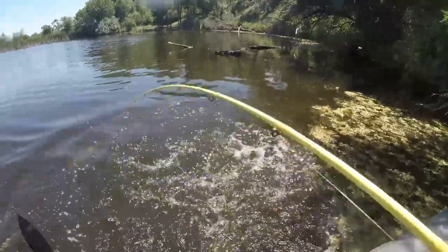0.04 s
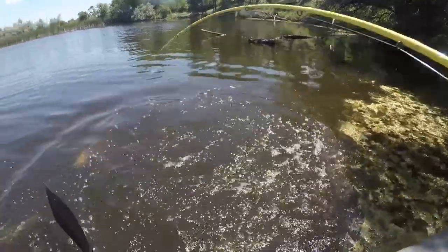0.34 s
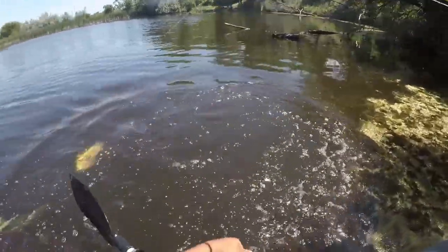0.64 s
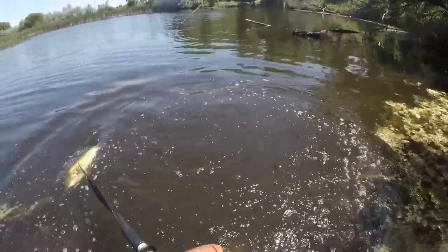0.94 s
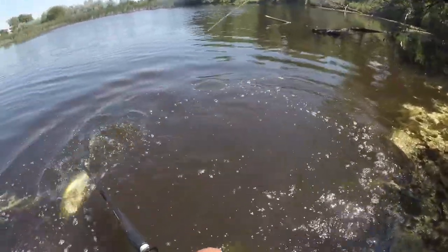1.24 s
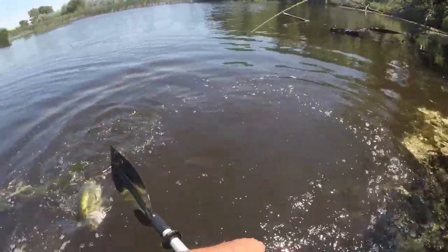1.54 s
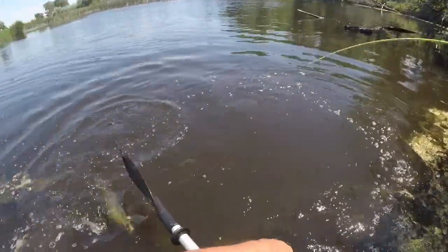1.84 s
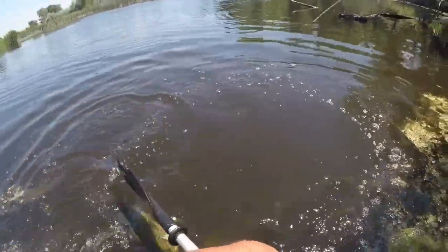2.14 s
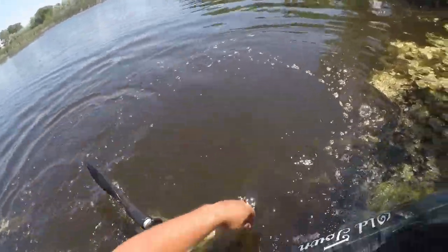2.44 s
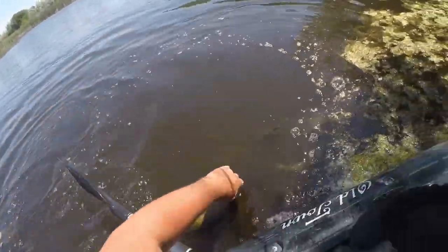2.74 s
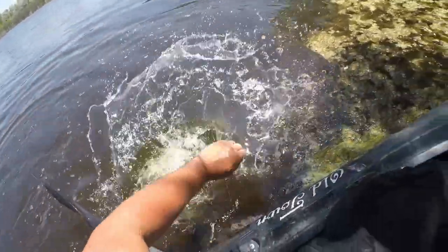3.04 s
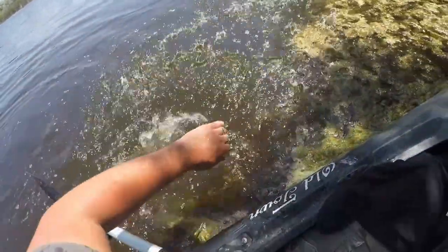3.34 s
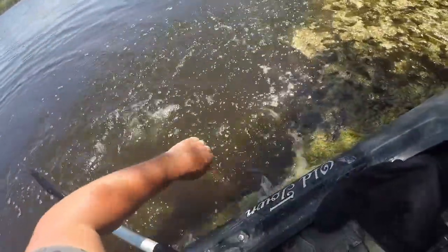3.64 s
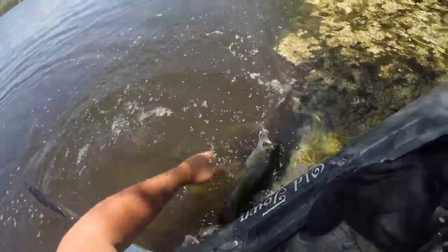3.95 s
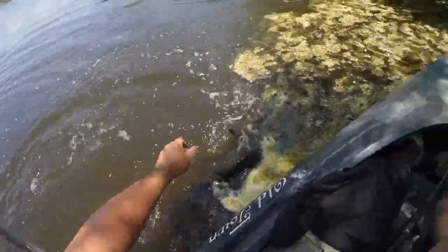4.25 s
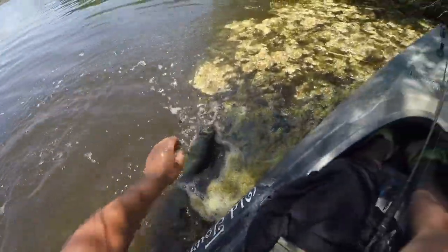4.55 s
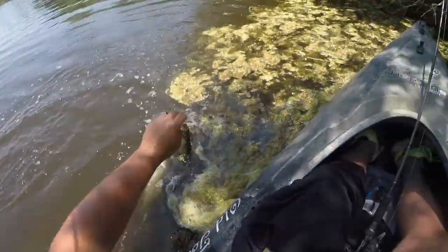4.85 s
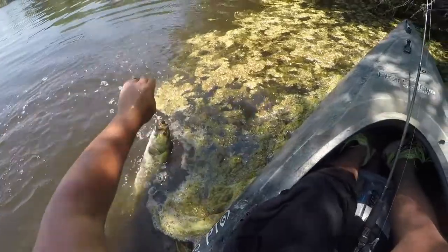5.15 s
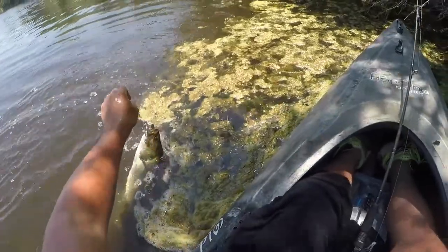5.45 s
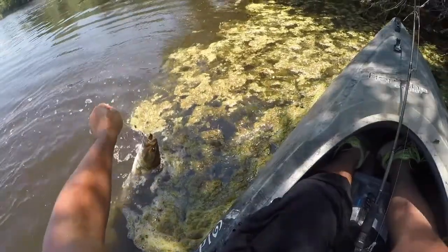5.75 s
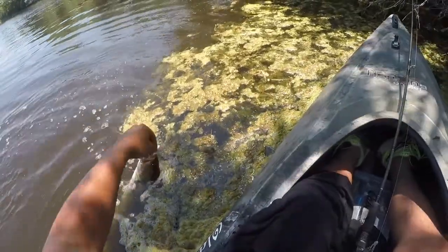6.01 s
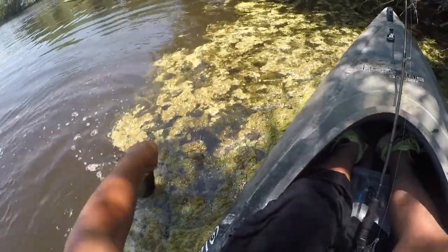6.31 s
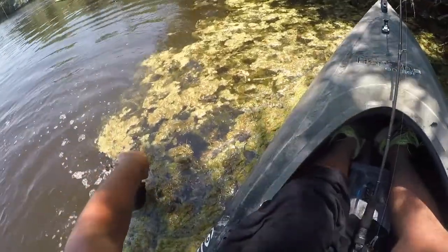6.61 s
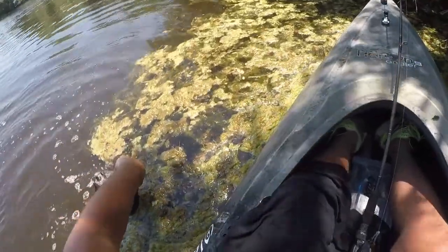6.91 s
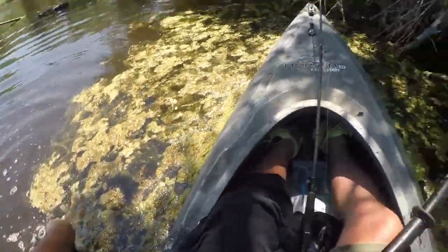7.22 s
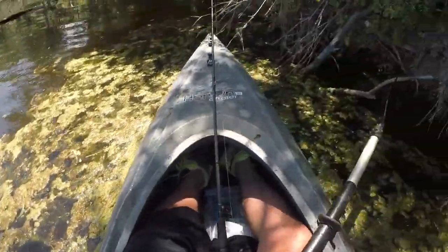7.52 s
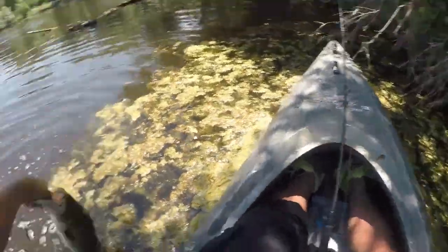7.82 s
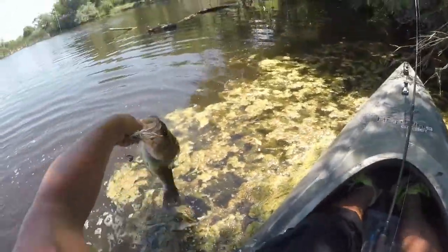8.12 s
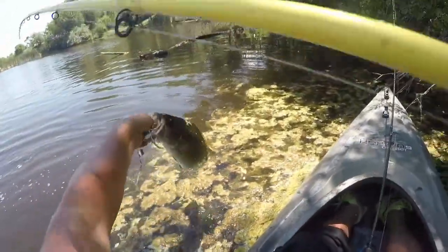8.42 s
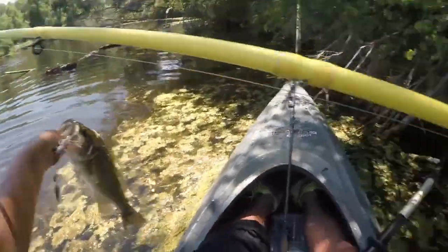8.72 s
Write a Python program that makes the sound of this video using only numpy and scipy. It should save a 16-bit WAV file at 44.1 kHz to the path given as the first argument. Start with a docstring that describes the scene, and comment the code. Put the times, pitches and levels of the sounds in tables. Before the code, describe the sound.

Close gurgling and a loud burst of splashing from a fish beside a small boat, settling into soft wind, bird chirps and knocks.

```python
"""Landing a fish from a kayak

On a pond, a hooked fish wallows right beside the boat, throws one big splash and is lifted out dripping.
The water sounds through ringing air pockets, bubbles and spray; tackle thuds on the hull.
Birds chip in the bank trees. Light wind, clothing and dull knocks sound at the body-worn microphone."""
import sys
import numpy as np
from scipy import signal
from scipy.fft import rfft, irfft, next_fast_len
from scipy.io import wavfile
from scipy.ndimage import uniform_filter1d, map_coordinates

SR = 44100
rng = np.random.default_rng(int(sys.argv[2]) if len(sys.argv) > 2 else 0)


def to_wav(s):
    """Save 16-bit WAV."""
    ch = np.atleast_2d(s).T  # columns
    pcm = np.round(np.clip(ch, -1, 1) * 32767)  # PCM
    wavfile.write(sys.argv[1], SR, pcm.astype(np.int16))


N = 391166

# tone of close spray: frequency_hz, density_db
SPRAY_SPECTRUM = [(900, -0.5), (2300, -2), (3500, -1.5), (6300, 3), (8500, -14), (11500, -23.5),
                  (13500, -17.5), (15000, -41.5)]
# tone of air or cloth brushing the microphone: frequency_hz, density_db
BRUSH_SPECTRUM = [(70, -25.5), (160, 0), (250, 1), (400, -12.5), (800, -20.5), (6000, -50)]
# reverberation of the bank trees: frequency_hz, t60_s
TREE_DECAY = [(200, 0.357), (10000, 0.118)]


def amp(db):
    """Decibels to gain."""
    return 10 ** (np.asarray(db) / 20)


def unit(x):
    """Scale to rms 1."""
    return x / np.sqrt(np.mean(x ** 2) + 1e-20)


def along(points, hz):
    """Read (frequency_hz, value) points on a log frequency axis."""
    point_hz, values = np.transpose(points)
    return np.interp(np.log(hz + 1), np.log(point_hz + 1), values)


def curves(rows, outside=None):
    """One value per sample for each column after the time."""
    time_s, *columns = np.transpose(rows)
    return [np.interp(np.arange(N) / SR, time_s, column, outside, outside) for column in columns]


def wobble(rate):
    """A smooth random curve, rate knots a second."""
    return map_coordinates(rng.standard_normal(int(N * rate / SR) + 4), [np.arange(N) * rate / SR])


def filtered(x, response):
    """Apply a gain that is a function of frequency."""
    length = x.shape[-1]
    padded = next_fast_len(length + 8192)
    return irfft(rfft(x, padded) * response(np.fft.rfftfreq(padded, 1 / SR)), padded)[..., :length]


def coloured(x, spectrum):
    """Shape by (frequency_hz, gain_db) points, at rms 1."""
    return unit(filtered(x, lambda hz: amp(along(spectrum, hz))))


def panned(x, pan_db=0):
    """Place in stereo by a fixed or moving level difference; positive is left."""
    gains = amp(np.reshape([pan_db / 2, -pan_db / 2], (2, -1)))
    return x * gains / gains.mean(axis=0)


def noise(spectrum, side_db, pan_db):
    """Coloured stereo noise with a given width and lean."""
    mid, side = coloured(rng.standard_normal((2, N)), spectrum)
    return panned(mid, pan_db) + amp(side_db) * np.array([side, -side])


def add(track, start_s, sound):
    """Mix a sound into a track at a time."""
    start = max(round(start_s * SR), 0)
    track[..., start:start + sound.shape[-1]] += sound[..., :max(N - start, 0)]


def levelled(x, level):
    """Make a grainy texture follow a short-term level."""
    power = np.abs(uniform_filter1d(np.mean(x ** 2, axis=0), size=2600))
    floor = .02 * np.mean(power[level > level.max() / 1000])
    return level * x / np.sqrt(power + floor)


def bubble_cloud(level, rate, low_hz, high_hz, cycles, spread_db, rise=0.232, width=0.186):
    """Bubbles ring and rise in pitch; they crowd to rate a second where the level is highest."""
    births = np.flatnonzero(rng.random(N) < rate / SR * (level / level.max()) ** .65)
    register, size, side, life = rng.random((len(births), 4)).T[:, :, None]
    hz = low_hz * (high_hz / low_hz) ** register
    t = np.arange(int(np.clip(cycles / low_hz, .001, .08) * SR)) / SR
    age = t * hz / (cycles * (life + .5))
    phase = 2 * np.pi * hz * t * (1 + rise * age / 2)
    ring = amp(-60 * age) * (1 - np.exp(-(t * hz / 2) ** 2))  # swells over two cycles
    ring = ring * amp(-spread_db * np.log(size + 0.00555))  # a few are much larger than the rest
    samples = (births[:, None] + np.arange(len(t))).ravel()
    lead = width * (side - .5)  # a bubble off to one side reaches that channel earlier
    channels = [ring * np.sin(phase + shift) for shift in (lead, -lead)]
    return np.array([np.bincount(samples, channel.ravel(), N)[:N] for channel in channels])


def fish_strokes(rounding=1.6, foam_db=-25, foam_fade_db_per_s=10, trickle_db=-71):
    """Bubbling and spray levels: each stroke rises and fades, and leaves foam that fizzes on."""
    # the fish wallows, thrashes and is lifted: peak_s, bubbling_db, spray_db, rise_20db_s, fade_20db_s
    strokes = [(0.07, -51, -53, 0.13, 0.3641), (0.853, -37, -45, 0.1382, 0.059),
               (0.935, -44, -51, 0.1841, 0.0755), (1.018, -38, -47, 0.1031, 0.1457),
               (1.135, -44, -46.5, 0.19, 0.339), (1.52, -53, -55, 0.2842, 0.2831),
               (1.634, -44, -43, 0.1074, 0.187), (1.77, -50, -48, 0.0533, 0.25),
               (2.03, -52, -56, 0.0378, 0.0769), (2.35, -48, -66.5, 0.07, 0.0464),
               (2.818, -31.5, -36, 0.0409, 0.1173), (2.893, -28, -31.5, 0.0636, 0.0549),
               (3.0, -27, -27, 0.1162, 0.37), (3.2, -33, -32, 0.1183, 0.2773),
               (3.34, -41, -33, 0.0959, 0.2407), (3.516, -38.5, -40, 0.0014, 0.0689),
               (4.03, -49, -50, 0.14, 0.17), (4.67, -59, -54, 0.3544, 0.0652),
               (8.27, -59.5, -50.5, 0.36, 0.41)]
    t = np.linspace(0, N / SR, N // 32)
    peak_s, bubbling_db, spray_db, rise_s, fade_s = np.transpose(strokes)[:, :, None]
    before, after = np.maximum(peak_s - t, 0), np.maximum(t - peak_s, 0)
    onset = amp(-20 * (before / rise_s) ** rounding)
    stroke = onset * amp(-20 * (after / fade_s) ** rounding)
    foam = onset * amp(foam_db - foam_fade_db_per_s * after)
    bubbling = np.linalg.norm(amp(bubbling_db) * stroke, axis=0) + amp(-150)
    spray = np.linalg.norm(amp(spray_db) * np.maximum(stroke, foam), axis=0)
    spray = np.hypot(spray, amp(trickle_db))
    return curves(np.column_stack([t, bubbling, spray]))


def splashes(breakup_db=-46.5, fizz_onset_db=-60):
    """Stirred water churns, gurgles and crackles; rough water adds crowds of short bubbles and a fizz."""
    # deep water churned by the tail: time_s, level_db
    churn_levels = [(2.8, -54.5), (2.89, -24), (2.935, -42), (2.985, -28), (3.07, -23), (3.13, -32),
                    (3.33, -46.5), (3.43, -38), (3.55, -49)]
    bubbling, spray = fish_strokes()
    gurgling = np.minimum(bubbling, amp(breakup_db))  # rough water breaks up slow bubbles
    seething = bubbling ** 2 / (bubbling + amp(breakup_db))
    fizzing = spray ** 2 / (spray + amp(fizz_onset_db))
    churn = amp(curves(churn_levels, outside=-150)[0])
    deep = bubble_cloud(churn, rate=620, low_hz=171.8, high_hz=860.4, cycles=11.6, spread_db=1.5)
    slow = bubble_cloud(gurgling, rate=150, low_hz=420.06, high_hz=1305.6, cycles=53.8,
                        spread_db=2.5, rise=0.552)
    small = bubble_cloud(gurgling, rate=230, low_hz=1755, high_hz=4686, cycles=53.3,
                         spread_db=3, rise=0.354)
    crowd = bubble_cloud(seething, rate=900, low_hz=755.5, high_hz=2691, cycles=26.2,
                         spread_db=3, width=1.97)
    crackle = bubble_cloud(spray, rate=4200, low_hz=2707, high_hz=7810, cycles=11.6, spread_db=4)
    flicker = amp(-4.5 + 2.55 * wobble(130))
    fizz = fizzing * flicker * noise(SPRAY_SPECTRUM, side_db=-6, pan_db=-1.5)
    return (panned(levelled(deep, churn), pan_db=-6.5)
            + levelled(slow, gurgling)
            + levelled(small, gurgling * amp(-6.5))
            + panned(levelled(crowd, seething), pan_db=2.18)
            + levelled(coloured(crackle, SPRAY_SPECTRUM), spray * amp(-3))
            + fizz)


def air_pockets(overtone_db=-22, waver=0.0311, swell_cycles=1.705, sink_db=-19, sink_hz=504):
    """Trapped air rings and glides as the pocket changes shape; rising ones shudder as they break up."""
    # the largest air pockets: start_s, pitch_hz, level_db, t60_s
    pockets = [(0.038, 617, -27.5, 0.016), (0.856, 484.4, -13.5, 0.0987), (0.997, 373.3, -24, 0.119),
               (1.015, 373.9, -21, 0.0886), (1.127, 923, -27, 0.064), (1.151, 476, -30, 0.0557),
               (1.21, 471.2, -32.5, 0.151), (1.627, 900, -38, 0.043), (2.033, 567, -35.5, 0.118),
               (2.222, 577, -29.5, 0.113), (2.855, 635.7, -15.5, 0.1215), (2.869, 508, -14, 0.084),
               (2.887, 767.5, -17, 0.052), (2.898, 512.8, -5, 0.0412), (2.969, 477, -16, 0.0395),
               (2.987, 452.5, -13, 0.053), (3.055, 150.8, -22.5, 0.109), (3.127, 1520, -17.5, 0.0264),
               (3.185, 1703, -19.5, 0.032), (3.335, 1950, -17.5, 0.009), (3.431, 994.4, -24, 0.053),
               (3.979, 777.6, -33.5, 0.1075), (4.048, 769.7, -28, 0.124), (4.101, 1566, -31, 0.0274),
               (4.262, 490.4, -28, 0.0206), (4.272, 721.6, -19.5, 0.0345)]
    # lean of a sound right beside the boat: frequency_hz, pan_db
    beside_boat = [(700, -6.5), (1000, -15.5), (1600, 8.5)]
    out, t = np.zeros((2, N)), np.arange(SR // 4) / SR
    unrest, shudder = wobble(160), wobble(260)
    for start_s, hz, level_db, t60_s in pockets:
        span = round(start_s * SR) + np.arange(len(t))
        # loud, low pockets are driven down and fall in pitch; the rest rise
        glide_oct = np.clip(0.24 * (sink_db - level_db) + 0.267 * np.log2(hz / sink_hz), -0.361, 0.89)
        pitch = hz * 2 ** (glide_oct * np.minimum(1.4 * t / t60_s, 1)) * (1 + waver * unrest[span])
        phase = 2 * np.pi * np.cumsum(pitch) / SR
        ring = np.sin(phase) + amp(overtone_db) * (np.sin(2 * phase) + np.sin(3 * phase) / 2)
        swell_s = swell_cycles / hz
        swell = np.sin(np.pi / 2 * np.minimum(t / swell_s, 1))
        fade = amp(-60 * np.maximum(t - swell_s, 0) / t60_s)
        shudder_db = 3.5 * max(glide_oct, 0) * shudder[span]
        alongside = np.clip(start_s - 1, 0, 1)  # the fish is drawn from ahead to the side of the boat
        pan_db = alongside * along(beside_boat, hz)
        add(out, start_s, panned(amp(level_db + shudder_db) * swell * fade * ring, pan_db))
    return out


def slaps(swell_s=0.00078, crack_t60_s=0.0119, spatter_db=-16, spatter_t60_s=0.0368, top_hz=10040):
    """A sheet of water lands flat: one hard, pitchless crack and a brief spatter."""
    # thrown water falling back on the pond: start_s, level_db
    landings = [(1.0098, -27), (1.2115, -30), (1.6278, -26), (1.7968, -25.5), (1.8576, -27),
                (1.9479, -34.5), (2.036, -33.5), (2.8148, -21.5), (2.8885, -18), (3.0042, -17),
                (3.2005, -12), (3.2074, -12.5), (3.2876, -18), (3.3, -16), (3.3356, -14.5), (4.0572, -24)]
    out, t = np.zeros(N), np.arange(SR // 20) / SR
    fade = amp(-60 * t / crack_t60_s) + amp(spatter_db - 60 * t / spatter_t60_s)
    envelope = fade * (1 - np.exp(-t / swell_s))  # the sheet does not land all at once
    for start_s, level_db in landings:
        burst = coloured(rng.standard_normal(len(t)) * envelope, SPRAY_SPECTRUM)
        crack = filtered(burst, lambda hz: 1 / (1 + (hz / top_hz) ** 4))
        add(out, start_s, amp(level_db) * crack / np.abs(crack).max())
    return panned(out)


def drops(cycles=30, rise=0.18, gain_db=3):
    """Each drop leaves one tiny ringing bubble."""
    # single drops plinking into the pond: start_s, level_db, pitch_hz
    plinks = [(0.492, -37, 7000), (1.4406, -31.5, 3654), (3.9462, -28, 6007), (4.0445, -24.5, 3880),
              (4.2244, -34.5, 3038), (4.7154, -31, 3975), (7.126, -26, 5580), (8.0495, -31, 7356)]
    out, t = np.zeros(N), np.arange(SR // 20) / SR
    for start_s, level_db, hz in plinks:
        age = t * hz / cycles
        phase = 2 * np.pi * hz * t * (1 + rise * np.minimum(age, 1) / 2)
        envelope = amp(-60 * age) * (1 - np.exp(-t * hz))
        add(out, start_s, amp(level_db + gain_db) * envelope * np.sin(phase))
    return panned(out)


def spurts(half_width_s=0.013):
    """A thin jet breaks into a quick burst of tiny bubbles, all of about one size."""
    # water squeezed out by the fins: peak_s, level_db
    jets = [(0.385, -51), (0.957, -47), (1.067, -40), (1.635, -45), (1.768, -42.5), (4.53, -52.5),
            (4.65, -50)]
    t = np.arange(N) / SR
    flow = sum(amp(level_db) / (1 + ((t - peak_s) / half_width_s) ** 2) for peak_s, level_db in jets)
    bubbles = bubble_cloud(flow, rate=3000, low_hz=3547, high_hz=4570, cycles=25.7, spread_db=1.5)
    return levelled(bubbles, flow)


def water_squeal(slope_db_per_oct=-10, jitter=0.0094):
    """A water cavity gives a short, rising squeal that runs into a gulp as the fish surfaces."""
    # course of the squeal: time_s, pitch_hz, level_db
    contour = [(0.765, 486.5, -60), (0.79, 542.1, -34), (0.825, 557.6, -32.5), (0.85, 623.3, -23.5),
               (0.86, 625, -54)]
    pitch_hz, level_db = curves(contour, outside=-150)
    phase = 2 * np.pi * np.cumsum(pitch_hz * (1 + jitter * wobble(200))) / SR
    tone = sum(amp(slope_db_per_oct * np.log2(k)) * np.sin(k * phase) for k in range(1, 12))
    return panned(amp(level_db) * tone)


def tackle_bumps(clack_t60_s=0.087, swell_s=0.00076):
    """Tackle clacks on the plastic hull, which answers with a low thud."""
    # tackle striking the hull: start_s, clack_db, thud_db
    bumps = [(0.122, -24.5, -17.5), (0.247, -36, -29), (0.756, -57.5, -25.5), (8.776, -61.5, -23.5)]
    # resonances of the hull: pitch_hz, level_db, t60_s
    hull_modes = [(31.6, -1, 0.21), (62.28, -5.5, 0.272), (154, -1, 0.0946)]
    # tone of the contact: frequency_hz, density_db
    clack_spectrum = [(200, 7), (1300, 0), (6200, -6.5), (8000, -22.5), (14000, -36.5)]
    out, t = np.zeros(N), np.arange(SR // 3) / SR
    thud = sum((-1) ** k * amp(level_db - 60 * t / t60_s) * np.sin(2 * np.pi * hz * t)
               for k, (hz, level_db, t60_s) in enumerate(hull_modes))
    swell = 1 - np.exp(-t / swell_s)
    for start_s, clack_db, thud_db in bumps:
        clack = coloured(rng.standard_normal(len(t)), clack_spectrum) * amp(-60 * t / clack_t60_s)
        add(out, start_s, (amp(thud_db) * thud + amp(clack_db) * clack) * swell)
    return panned(out)


def close_knocks(note_hz=239, t60_s=0.047, swell_s=0.00169, tap_db=-19):
    """Dull, close knocks, each one short low note with a faint tap."""
    # knocks to the right of the microphone: start_s, level_db
    knocks = [(1.973, -36), (2.333, -34.5), (2.372, -32.5), (2.554, -34.5), (4.212, -31.5), (7.309, -25),
              (7.637, -31.5), (7.692, -32.5), (7.773, -34.5), (8.408, -30.5), (8.627, -26.5), (8.697, -30)]
    # tone of the tap: frequency_hz, density_db
    tap_spectrum = [(1400, 7.5), (3500, -32.5)]
    out, t = np.zeros(N), np.arange(SR // 8) / SR
    fade = amp(-60 * t / t60_s)
    note = np.sin(2 * np.pi * note_hz * t) * fade * (1 - np.exp(-t / swell_s))
    for start_s, level_db in knocks:
        tap = coloured(rng.standard_normal(len(t)), tap_spectrum) * fade
        add(out, start_s, amp(level_db) * (note / note.max() + amp(tap_db) * tap))
    return panned(out, pan_db=-15.5)


def tick(centre_hz, t60_s=0.0231):
    """A very short, dry click in one broad band."""
    t = np.arange(SR // 20) / SR
    band = filtered(rng.standard_normal(len(t)),
                    lambda hz: (hz * centre_hz / (hz ** 2 + centre_hz ** 2)) ** 3)
    return unit(band) * amp(-60 * t / t60_s) * (1 - np.exp(-t * centre_hz / 2))


def lifting(drips=16, drip_start_s=8.215, drip_length_s=0.29, drip_db=-44, fade_db_per_s=33.5):
    """The tackle ticks, and drips from the raised fish patter ever more faintly on the weed mat."""
    # hard ticks of line and rod: start_s, level_db, centre_hz
    tackle_ticks = [(8.481, -32, 1900), (8.628, -36.5, 4757)]
    out = np.zeros(N)
    for start_s, level_db, centre_hz in tackle_ticks:
        add(out, start_s, amp(level_db) * tick(centre_hz))
    for delay_s in drip_length_s * (np.arange(drips) + rng.random(drips)) / drips:
        level_db = drip_db - fade_db_per_s * delay_s + rng.normal(0, 4)
        add(out, drip_start_s + delay_s, amp(level_db) * tick(centre_hz=5320))
    return panned(out)


def birds(half_width_s=0.011, sweep=0.26, rasp=0.1546, scratch_db=-10):
    """Chips from the bank, thin or harsh, sweep quickly up to a held note and linger in the trees."""
    # bird chips: peak_s, pitch_hz, level_db, roughness (0-1)
    chips = [(5.204, 3979, -40.5, 0.56), (5.362, 4040, -42, 0.51), (5.846, 4440, -33, 1),
             (6.651, 3140, -51.5, 0.92), (6.724, 3350, -53, 0.98), (6.939, 4462, -32.5, 0.89)]
    scratch_spectrum = [(500, -12.5), (5300, -6.5), (12000, -26.5)]  # frequency_hz, density_db
    out, t = np.zeros(N), np.arange(-SR // 12, SR // 12) / SR
    tremor = wobble(2400)
    upsweep = 1 + sweep * np.minimum(np.tanh(t / half_width_s / 2), .2)
    envelope = 1 / np.cosh(np.pi / 2 * t / half_width_s)
    for peak_s, hz, level_db, roughness in chips:
        pitch = hz * upsweep * (1 + roughness * rasp * tremor[round(peak_s * SR):][:len(t)])
        tone = np.sqrt(2) * np.sin(2 * np.pi * np.cumsum(pitch) / SR)
        scratch = coloured(rng.standard_normal(len(t)), scratch_spectrum)
        add(out, peak_s + t[0], amp(level_db) * envelope * (tone + amp(scratch_db) * scratch))
    calls = panned(out)
    return calls + amp(-2.5) * echo(calls, TREE_DECAY)


def clothing(half_width_s=0.05):
    """Cloth drags close to the microphone in short, scuffing swells."""
    # rubs as the angler turns: peak_s, level_db
    rubs = [(7.265, -40), (7.81, -46), (8.36, -41.5), (8.755, -41)]
    t = np.arange(N) / SR
    pressure = sum(amp(db) * np.exp(-((t - peak_s) / half_width_s) ** 2 / 2) for peak_s, db in rubs)
    return pressure * amp(3.8 * wobble(70)) * noise(BRUSH_SPECTRUM, side_db=4, pan_db=-17)


def wind():
    """Lumpy buffeting and a higher flutter at the microphone, over the steady hush of the pond."""
    # course of the buffeting: time_s, level_db
    buffet_levels = [(0, -31), (0.15, -29), (0.4, -33.5), (2, -53.5), (4.45, -58), (4.68, -35.5), (7, -42),
                     (8.87, -37)]
    # course of the flutter: time_s, level_db
    flutter_levels = [(0, -39.5), (0.42, -58), (0.9, -51), (1.6, -57), (2.3, -48.5), (3.7, -57), (4.7, -49),
                      (6.7, -57.5), (7.2, -47.5), (8.87, -47)]
    # the wind shifts to the right of the microphone: time_s, pan_db
    lean = [(4, -1), (4.8, -11)]
    # rumble of the buffeting: frequency_hz, density_db
    buffet_spectrum = [(12, -5), (28, 3.5), (65, -5.5), (200, -22), (500, -61)]
    # open air over the pond: frequency_hz, density_db
    hush_spectrum = [(105, -10.5), (180, 3), (300, -3), (541, -6), (1780, -12.5), (4500, -16.5),
                     (6180, -13.5), (9610, -19.5), (14000, -30.5), (15000, -56.5)]
    (buffet_db,), (flutter_db,), (pan_db,) = curves(buffet_levels), curves(flutter_levels), curves(lean)
    gust = wobble(14)
    buffet = amp(buffet_db - 1 + 2 * gust) * noise(buffet_spectrum, side_db=-8, pan_db=pan_db)
    flutter_gain = amp(flutter_db + gust + 3.17 * wobble(35))
    flutter = flutter_gain * noise(BRUSH_SPECTRUM, side_db=2.5, pan_db=pan_db)
    hush = amp(-55.5) * noise(hush_spectrum, side_db=0, pan_db=-0.5)
    return buffet + flutter + hush


def echo(x, decay):
    """Scattered reflections: a diffuse stereo tail in which each frequency dies at its own speed."""
    hz, t, spectra = signal.stft(rng.standard_normal((2, SR // 2)), SR, nperseg=256)
    fade = amp(-60 * t / along(decay, hz)[:, None])
    _, tail = signal.istft(spectra * fade, SR, nperseg=256)
    return signal.fftconvolve(x, tail / np.linalg.norm(tail[0]), axes=1)[:, :N]


def scene():
    """Heard from the seat: close sounds glance off the boat and return faintly from the bank."""
    # short reflections off the boat: frequency_hz, t60_s
    boat_decay = [(200, 0.128), (10000, 0.04)]
    water = splashes() + drops() + slaps() + spurts()
    water = filtered(water, lambda hz: hz ** 4 / (hz ** 4 + 132 ** 4))  # broken water has little bass
    near = water + air_pockets() + tackle_bumps() + close_knocks() + lifting() + water_squeal()
    glance = filtered(near, lambda hz: hz ** 2 / (hz ** 2 + 1100 ** 2))  # long waves bend round the hull
    reflections = amp(-12) * echo(glance, boat_decay) + amp(-18) * echo(near, TREE_DECAY)
    return near + reflections + birds() + clothing() + wind()


def record(dry, top_hz=15100):
    """The body-worn camera picks up nothing above its band limit."""
    return filtered(dry, lambda hz: hz < top_hz)


dry = scene()
out = record(dry)
to_wav(out)
```